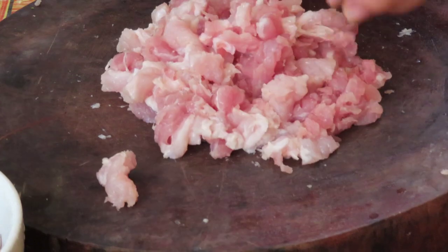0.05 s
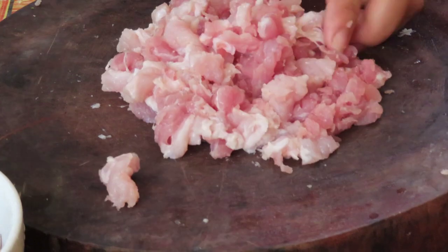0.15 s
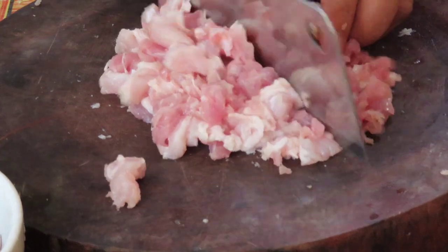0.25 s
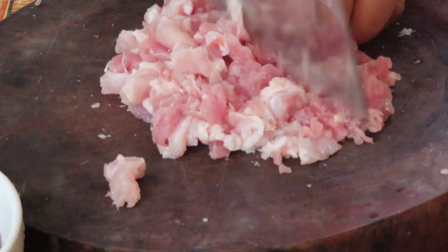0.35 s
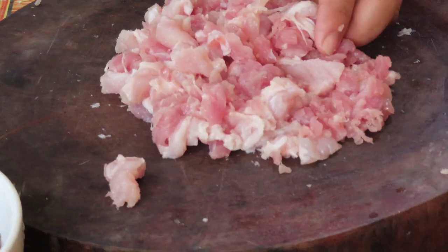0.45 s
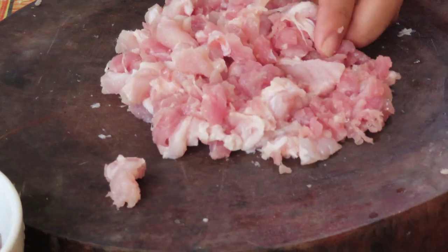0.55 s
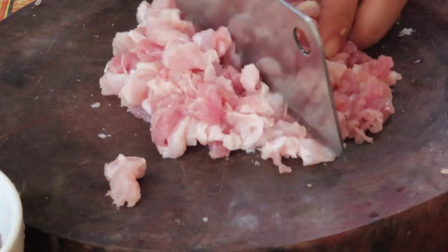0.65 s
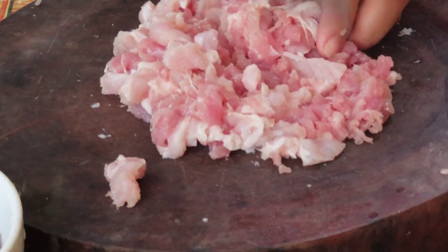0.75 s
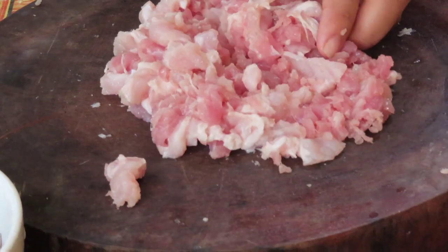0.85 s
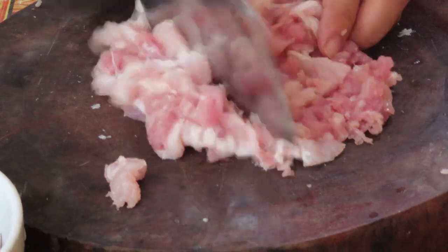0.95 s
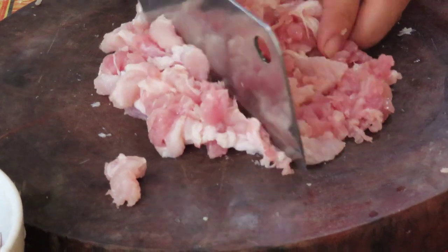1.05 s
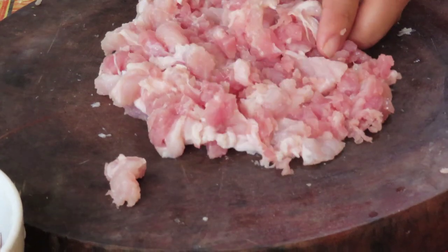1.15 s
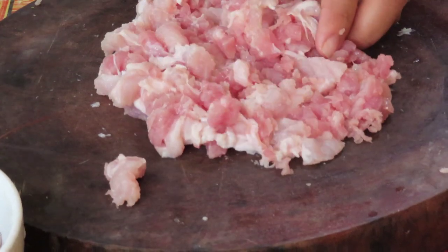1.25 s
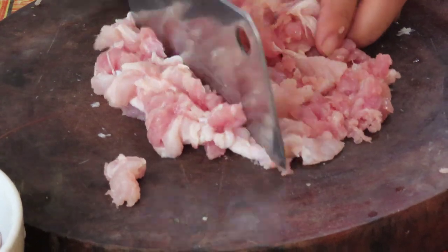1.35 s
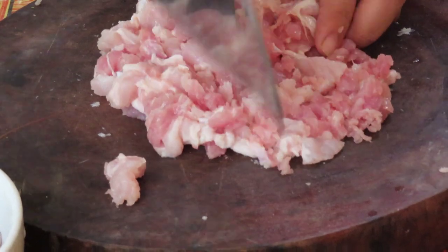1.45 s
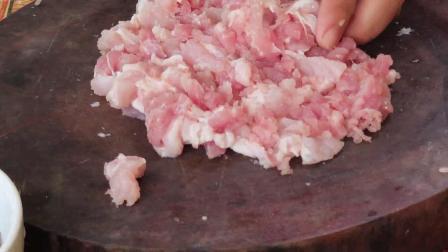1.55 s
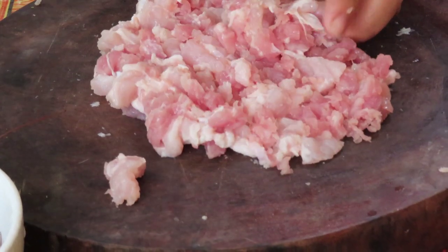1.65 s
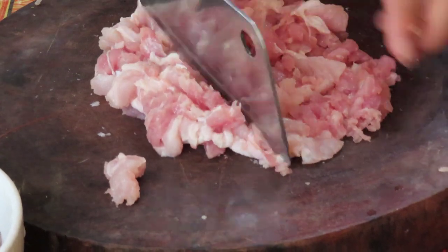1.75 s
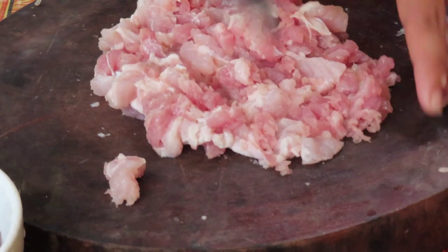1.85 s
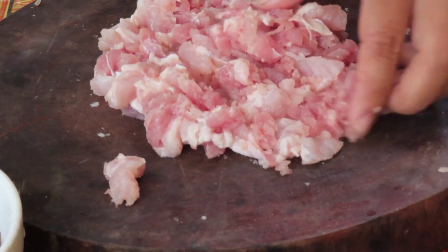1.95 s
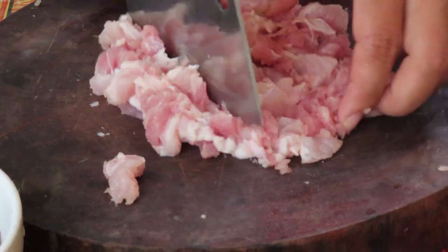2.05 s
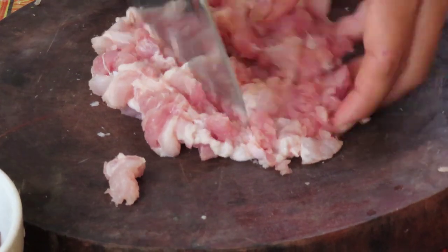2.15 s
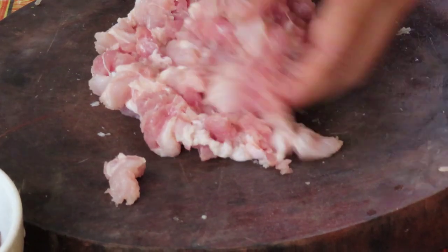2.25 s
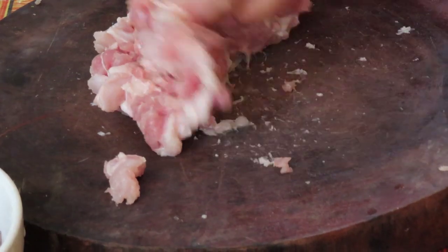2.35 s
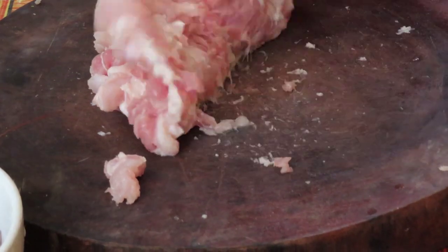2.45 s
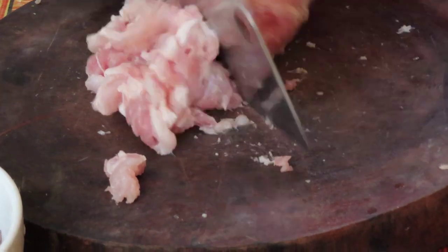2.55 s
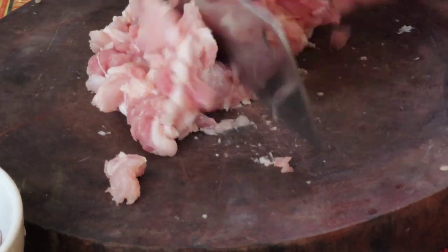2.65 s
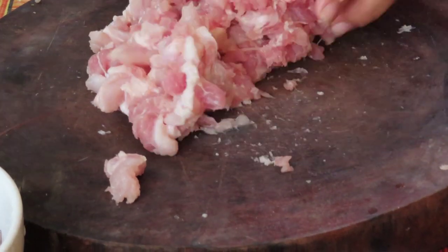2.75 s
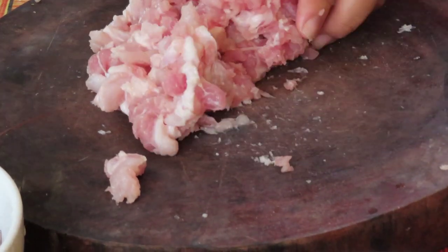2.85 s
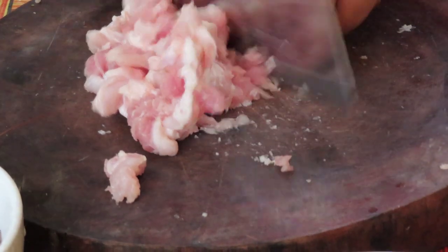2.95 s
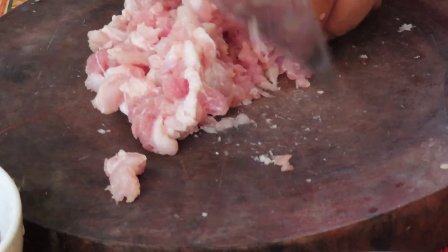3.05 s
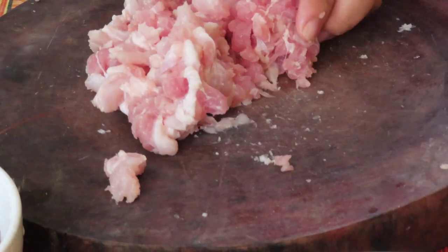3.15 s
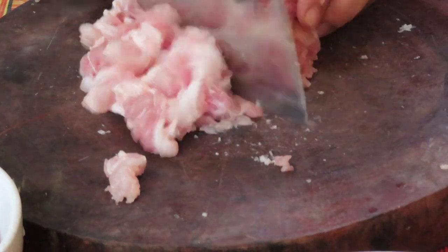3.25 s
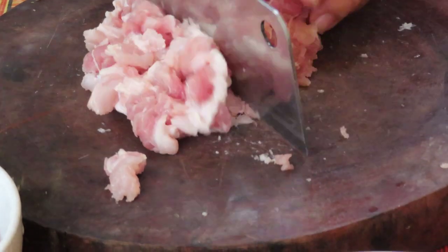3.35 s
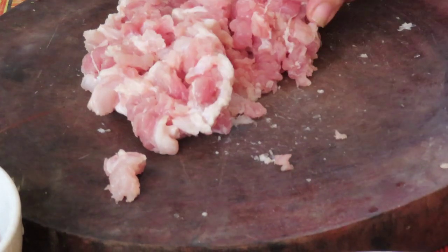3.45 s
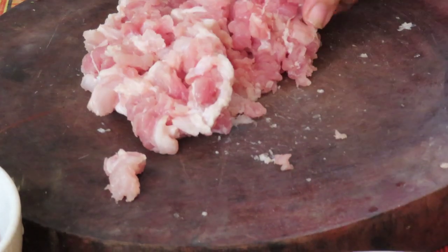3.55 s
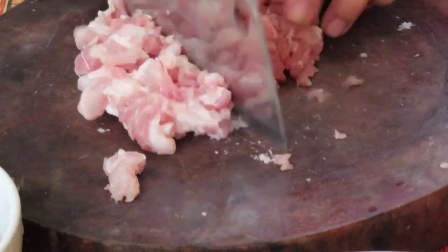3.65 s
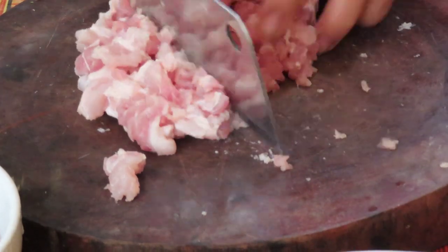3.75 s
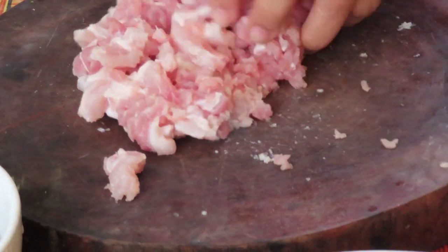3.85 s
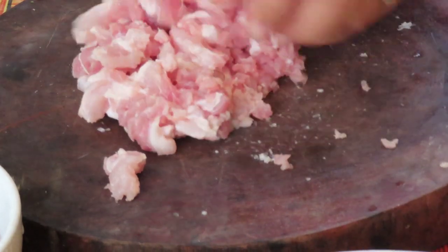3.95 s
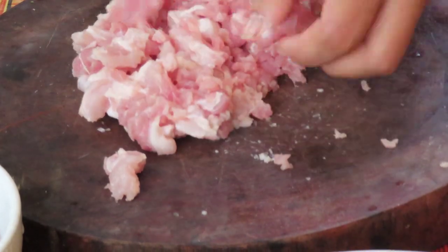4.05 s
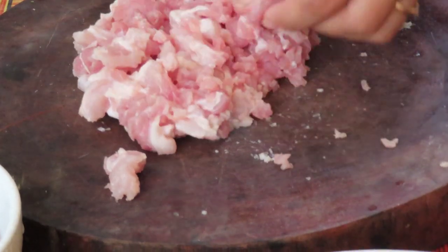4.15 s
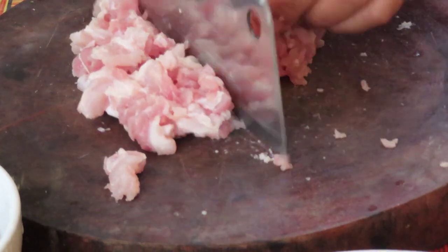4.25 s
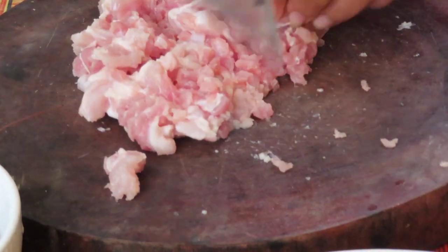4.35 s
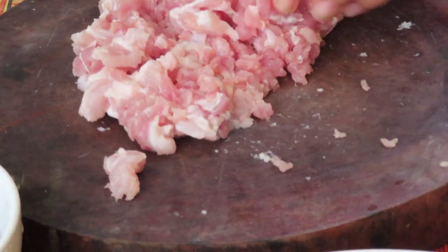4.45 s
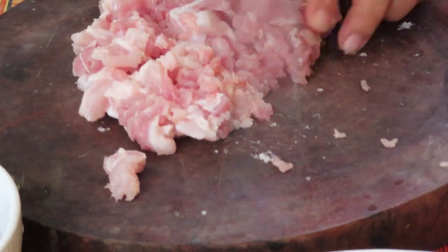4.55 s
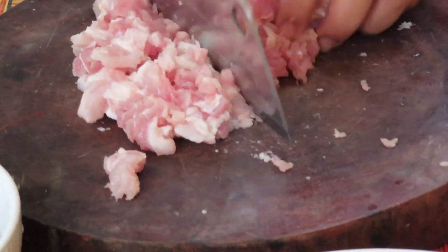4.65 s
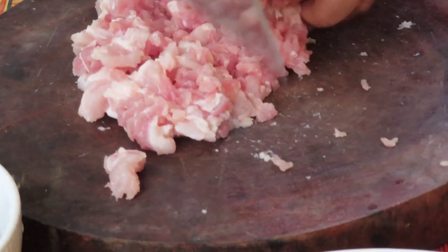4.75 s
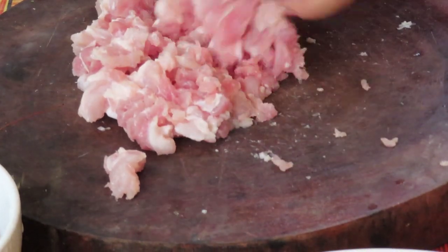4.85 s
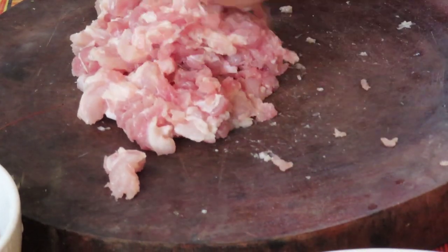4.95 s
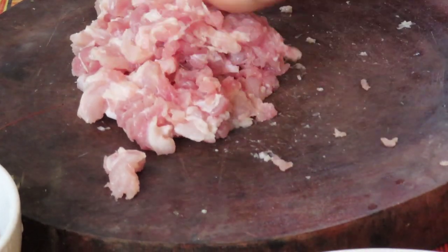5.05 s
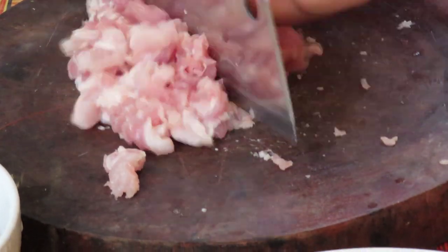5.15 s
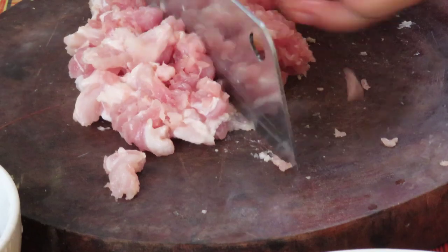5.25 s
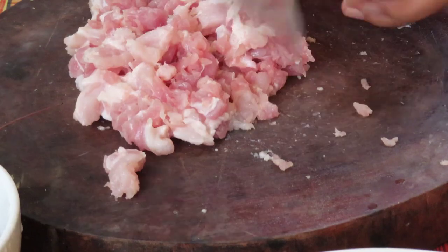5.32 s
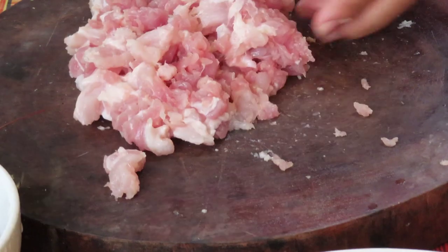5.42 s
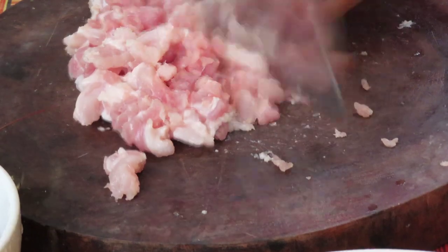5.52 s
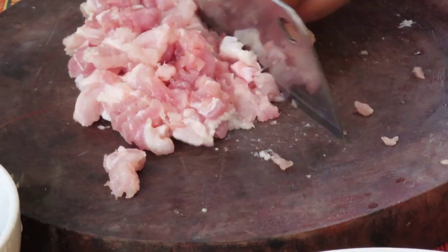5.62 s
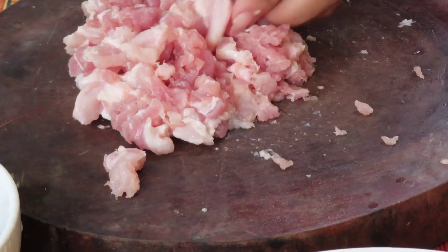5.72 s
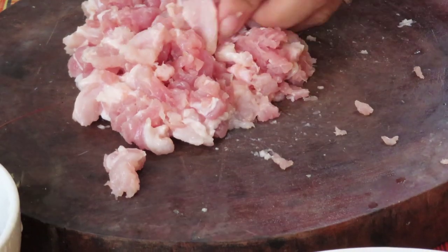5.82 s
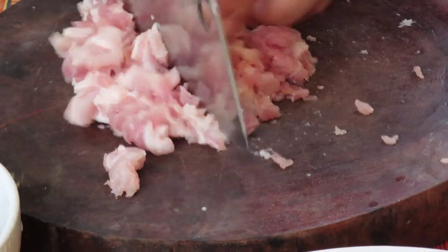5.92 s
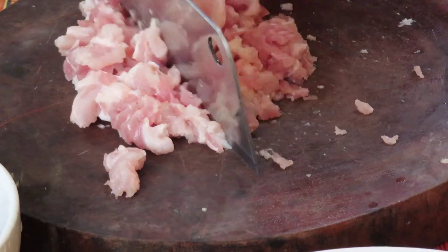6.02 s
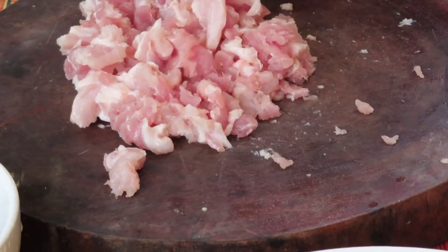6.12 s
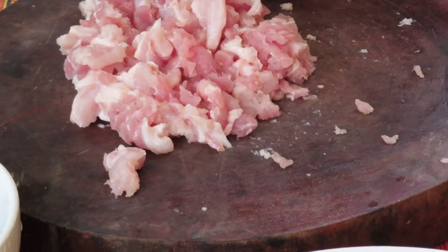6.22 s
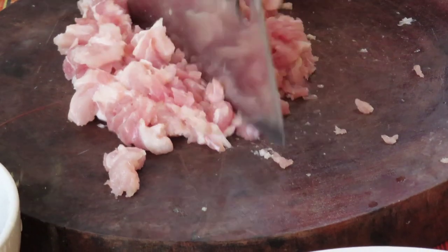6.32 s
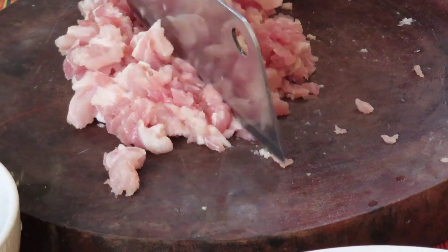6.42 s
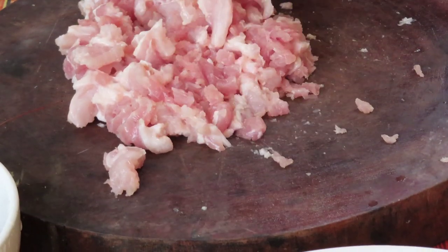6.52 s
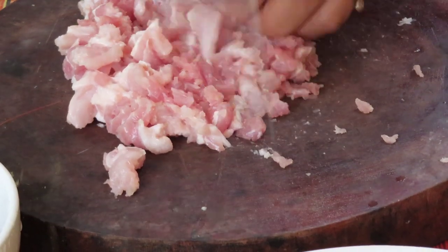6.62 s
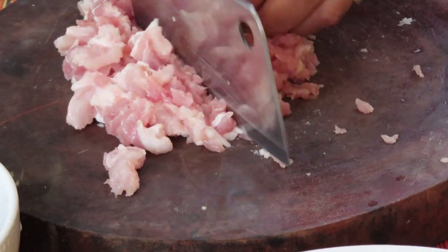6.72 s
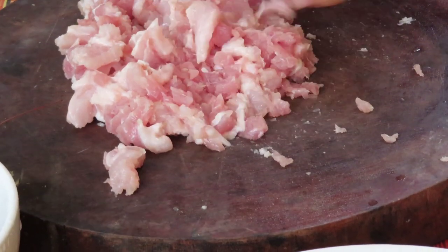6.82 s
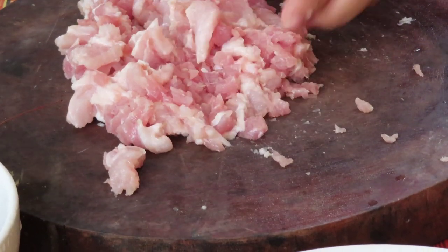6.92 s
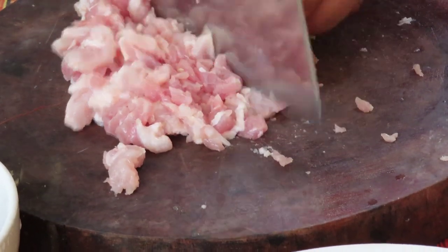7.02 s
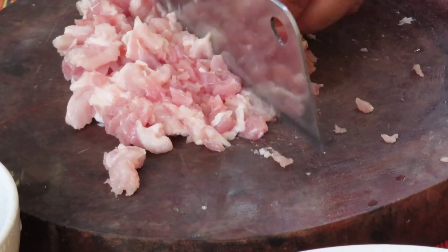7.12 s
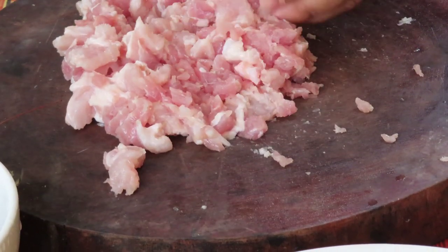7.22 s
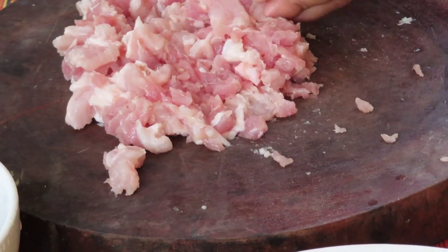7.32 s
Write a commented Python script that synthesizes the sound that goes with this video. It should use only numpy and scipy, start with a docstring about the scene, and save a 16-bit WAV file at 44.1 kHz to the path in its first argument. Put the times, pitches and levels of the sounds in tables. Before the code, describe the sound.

Steady single chops land on a heavy wooden block, nearly three per second, loud and close. Each is a sharp hollow knock with a table thump, then a brief rattle and tiny dish clinks as things settle. A thin, wavering metallic ring lingers until the next blow. The pace pauses slightly a few times; later chops knock softer but thump and rattle more. Open yard, faint low rumble, slight distant echo.

```python
"""Cleaver mincing meat on a board

A steel cleaver chops on a thick wooden board outdoors, close to a stereo microphone.
Dying sines make the board's knock, the table's thump, the dishes and the beating blade.
Shaped noise makes the soft lead-in to each knock, the rattle and the yard;
sparse echoes and a far wall answer."""
import sys
import numpy as np
from scipy import signal
from scipy.io import wavfile
from scipy.ndimage import uniform_filter1d

SR = 44100
rng = np.random.default_rng(int(sys.argv[2]) if len(sys.argv) > 2 else 0)


def to_wav(sig):
    """Store sig (one row per channel, or 1-D mono) as 16-bit WAV at the path in sys.argv[1].

    Samples outside -1..1 are clipped; the rate is SR.
    """
    pcm = np.clip(np.atleast_2d(sig), -1, 1) * 32767
    pcm = np.round(pcm).astype(np.int16)
    wavfile.write(sys.argv[1], SR, pcm.T)  # frames by channels


N = 325458
LEAD = SR // 10  # samples computed before the start, then cut


def gain_of(db):
    """Decibels to a factor."""
    return 10 ** (np.asarray(db) / 20)


def panned(right_db):
    """Left and right gains, right_db down and up."""
    return gain_of([[-right_db], [right_db]])


def evened(x):
    """Scales to rms 1."""
    return x / np.sqrt(np.mean(x ** 2) + 1e-20)


def seconds(count):
    """Time axis of count samples."""
    return np.arange(count) / SR


def build_up(count, rise_s):
    """Exponential approach to 1."""
    return 1 - np.exp(-seconds(count) / rise_s)


def read(points, hz):
    """Reads a curve on a log-frequency axis."""
    f, value = np.transpose(points)
    return np.interp(np.log(hz + 1), np.log(f + 1), value)


def add(mix, s, sound):
    """Mixes a sound in at s seconds."""
    part = mix[..., LEAD + round(s * SR):][..., :sound.shape[-1]]
    part += sound[..., :part.shape[-1]]


def struck(modes, length_s, spread_db=0):
    """Dying sines; spread_db varies each mode's strength at random."""
    t = seconds(round(length_s * SR))
    hz, db, t60 = np.transpose(modes)[:, :, None]
    db = db + spread_db * rng.standard_normal(db.shape)
    return (gain_of(db - 60 * t / t60) * np.sin(2 * np.pi * hz * t)).sum(0)


# Port difference. Each row: frequency in Hz, share of independent noise in dB.
PORT_UNLIKE = [(60, -30.5), (250, -20), (800, -15.5), (2000, -5.5), (5000, -1.5), (15000, -0.5)]
# Port phase. Each row: frequency in Hz, lead of the left port in radians.
PORT_LEAD = [(2000, 0), (6000, .1), (10000, 1.3), (16000, 3.0)]


def noise(colour, size, patchy_db):
    """Stereo coloured noise, patchy in time and frequency, as the two ports hear it."""
    frames = (N + LEAD) * 4 // size + 5
    hz = np.fft.rfftfreq(size, 1 / SR)
    a, b, c, d, patches = rng.standard_normal((frames, len(hz), 5)).T
    patches = uniform_filter1d(patches, size=8, axis=0)
    patches = evened(uniform_filter1d(patches, size=8, axis=1))
    unlike = np.clip(gain_of(read(PORT_UNLIKE, hz)), 0, 1)[:, None]
    left = a + 1j * b
    right = np.sqrt(1 - unlike ** 2) * left + unlike * (c + 1j * d)
    right = right * np.exp(-1j * read(PORT_LEAD, hz))[:, None]
    spectra = np.array([left, right]) * gain_of(read(colour, hz)[:, None] + patchy_db * patches)
    waves = signal.istft(spectra, nperseg=size, noverlap=size * 3 // 4)[1]
    return evened(waves[:, :N + LEAD])


# Yard noise colour. Each row: frequency in Hz, relative density in dB per Hz.
YARD_COLOUR = [(15, -46), (25, -25), (48, -1.5), (87, -6), (117, 0.5), (180, -11.5), (229, -13),
               (545, -23.5), (676, -20.5), (753, -20.5), (6550, -46), (16000, -67)]
# Yard swell. Each row: time in seconds, relative rumble level in dB.
YARD_SWELL = [(0, -60.5), (.9, -59), (1.298, -64), (3.401, -68.5), (4.4, -64), (6.001, -58), (7.38, -55.5)]
TONE_HZ, TONE_DB = 633, -68


def yard():
    """Distant rumble and air, coloured noise of slowly changing level, with one faint steady tone far off."""
    s, db = np.transpose(YARD_SWELL)
    t = seconds(N + LEAD) - LEAD / SR
    tone = gain_of(TONE_DB) * np.sin(2 * np.pi * TONE_HZ * t)
    rumble = noise(YARD_COLOUR, size=2048, patchy_db=1.5)
    return gain_of(np.interp(t, s, db) + 8.5) * rumble + tone


WALL_S, WALL_DB = .228, -30  # level before the high-pass


def near_echoes():
    """Sparse dull reflections from table and ground, a little unlike at the two ports."""
    count, spacing = SR // 2, 20
    taps = np.zeros((2, count))
    slots = np.arange(60, count - 20, spacing)
    at = slots + rng.integers(0, spacing, (2, len(slots)))
    np.put_along_axis(taps, at, rng.choice([-1., 1.], at.shape), 1)
    taps[1] = taps[0] + 0.41 * np.diff(taps[1], prepend=0)
    near = signal.lfilter([1], [1, -.7], taps) * gain_of(-60 * seconds(count) / 0.29)
    return near * gain_of(-23.5) / np.linalg.norm(near[0])


def wall_echo():
    """One far wall scatters the treble back."""
    wall = np.zeros(SR // 2)
    scatter = rng.standard_normal(200) * np.exp(-np.arange(200) / 90)
    wall[round(WALL_S * SR):][:200] = gain_of(WALL_DB) * scatter / np.linalg.norm(scatter)
    return signal.sosfilt(signal.butter(2, 3000, "high", fs=SR, output="sos"), wall)


def surroundings(board, shaken):
    """Near reflections of board and shaken dishes; the far wall answers the board only."""
    near = signal.fftconvolve((board + shaken)[None], near_echoes(), axes=1)
    around = near + signal.fftconvolve(board, wall_echo())
    return around[:, :len(board)]


CREST_S, EARLY_S = .009, .0115  # crest after the knock; greatest advance
SOFT_DB, LOUD_DB = -41, -38  # table lead-in levels of no advance and of the greatest


def crest(s, lead_in_db):
    """Moment of the thump's crest: earlier where the lead-in noise is louder."""
    advance = np.clip((lead_in_db - SOFT_DB) / (LOUD_DB - SOFT_DB), 0, 1)
    return s + CREST_S - EARLY_S * advance


# Chops. Each row: knock time in seconds, then relative levels in dB of knock, thump, lead-in noise,
# first landing, second landing and rock, then beat swell in seconds after the knock,
# then relative levels in dB of lower ring, upper ring and overtones.
CHOP_ROWS = [(-0.033, -5, -19, -40, -24.5, -39, -26, 0.111, -47, -40.5, -46.5),
             (0.33, -1.5, -12, -40.5, -16.5, -26.5, -20.5, 0.125, -34.5, -38, -52.5),
             (0.692, -4, -11, -42, -62, -27, -23, 0.157, -38, -44, -48),
             (1.0494, -1, -10, -42.5, -62, -38.5, -31, 0.118, -43.5, -59, -48),
             (1.408, -2.5, -12.5, -46, -29, -47, -39, 0.051, -65, -49, -61),
             (1.763, 0.45, -16, -65, -33.5, -51, -26.5, 0.108, -50.5, -45.5, -56),
             (2.1129, -3, -16.5, -41.5, -59, -59, -46.5, 0.077, -51.5, -59, -62),
             (2.627, 0.9, -17.5, -57.5, -61, -47, -28.5, 0.126, -50, -48, -57),
             (3.0021, -2, -19.5, -57.5, -54, -64, -25.5, 0.124, -64.5, -55.5, -64),
             (3.3687, -9.5, -15.5, -48.5, -34, -67, -41, 0.115, -45, -47, -54),
             (3.7328, -8.5, -14.5, -45, -62, -40.5, -29, 0.156, -41.5, -46.5, -57.5),
             (4.2878, -2, -13, -58.5, -27, -39.5, -33, 0.114, -49, -82, -47),
             (4.6692, -5.5, -14, -62.5, -27, -46, -41, 0.063, -44.5, -58.5, -70.5),
             (5.2344, -4.5, -12, -48, -30, -24, -15, 0.172, -40.5, -37, -48.5),
             (5.6287, -13, -10.5, -35.5, -24, -24, -17, 0.188, -44, -72, -49),
             (5.9985, -5.5, -6, -40.5, -23.5, -42, -41, 0.121, -44.5, -47.5, -49),
             (6.3786, -8, -7.5, -38.5, -40, -36, -37, 0.144, -40.5, -55, -46.5),
             (6.7521, -2.5, -12.5, -45, -21.5, -29, -18.5, 0.095, -42.5, -40, -46),
             (7.1137, -4.5, -7, -46, -46, -45, -31, 0.108, -45.5, -42, -52)]
LAND_S, RELAND_S = .052, .091  # after the thump crest


def landings():
    """Time and level of both landings of the dishes after every chop."""
    found = []
    for s, _, _, lead_in_db, first_db, second_db, *_ in CHOP_ROWS:
        crest_s = crest(s, lead_in_db)
        found += [(crest_s + LAND_S, first_db), (crest_s + RELAND_S, second_db)]
    return found


# Dish modes. Each row: frequency in Hz, relative level in dB, t60 in seconds.
DISH_MODES = [(888, -9, .04), (1570, -7, .05), (2060, -10, .05), (2430, -12, .06), (2690, -11, .04),
              (3130, -23, .22), (3230, -9, .07), (3370, -5, .06), (4050, -14, .04), (5110, -17, .025),
              (5960, -17, .03), (6180, -9, .03), (8110, -24, .02)]
LAND_PAN_DB, LAND_PAN_SPREAD_DB = 2.2, 2.0  # left over right


def clinks():
    """Each landing is a ms of chatter that rings the dishes, usually to the left."""
    out, t = np.zeros((2, N + LEAD)), seconds(300)
    for s, db in landings():
        pan_db = LAND_PAN_DB + LAND_PAN_SPREAD_DB * rng.standard_normal()
        chatter = rng.standard_normal(len(t)) * np.exp(-t / .001)
        dishes = struck(DISH_MODES, .25, spread_db=2.5)
        sound = signal.fftconvolve(chatter / np.linalg.norm(chatter), dishes)
        add(out, s, gain_of(db - 5.0) * panned(-pan_db / 2) * sound)
    return out


# Rattle colour. Each row: frequency in Hz, relative density in dB per Hz.
RATTLE_COLOUR = [(120, -36.5), (200, -14), (366, -5), (465, -8.5), (899, -3), (3010, -17.5), (3300, -19),
                 (11900, -36), (16000, -44.5)]
USUAL_THUMP_DB = -12  # table level
RATTLE_DB, RATTLE_SLOPE = -22, 0.69  # at the usual thump; dB per dB of thump
SHAKE_RISE_S, SHAKE_DB_PER_S = 0.0013, 159
SETTLE_S, SETTLE_DB_PER_S = 0.12, 218.5  # extra decay once the dishes settle
LINGER_S, LINGER_DB, LINGER_DB_PER_S = .45, -31.5, 59.5  # faint buzz outlasting the shake


def shaking():
    """Envelope of one shake: fast rise, decay that steepens as the dishes settle, faint linger."""
    t = np.arange(0, LINGER_S, 1 / SR)
    shake = gain_of(-SHAKE_DB_PER_S * t - SETTLE_DB_PER_S * np.maximum(t - SETTLE_S, 0))
    linger = gain_of(LINGER_DB - LINGER_DB_PER_S * t)
    return (shake + linger) * np.minimum(t / SHAKE_RISE_S, 1)


def rattle():
    """Table and dishes buzz in uneven grains, flaring at landings; soft noise swells in 30 ms before knocks."""
    count = N + LEAD
    level, lead_in = np.zeros(count), np.zeros(count)
    shake = shaking()
    before_s = np.arange(-.03, 0, 1 / SR)
    flare = np.exp(-seconds(1500) / .013) * build_up(1500, 0.0032)
    for s, _, thump_db, lead_in_db, *_ in CHOP_ROWS:
        shake_db = RATTLE_DB + RATTLE_SLOPE * (thump_db - USUAL_THUMP_DB)
        add(level, s - SHAKE_RISE_S / 2, gain_of(shake_db) * shake)
        add(lead_in, s + before_s[0], gain_of(lead_in_db + 20.5 + 1010 * before_s))
    for s, db in landings():
        add(level, s, gain_of(db - 2.0) * flare)
    grains = gain_of(2.0 * evened(uniform_filter1d(rng.standard_normal(count), size=350)))
    buzz = noise(RATTLE_COLOUR, size=512, patchy_db=3.0)
    # about 250 random contacts per second keep the dishes singing
    contacts = level * rng.standard_normal(count) * (rng.random(count) < 250 / SR)
    ringing = gain_of(-13) * signal.oaconvolve(contacts, struck(DISH_MODES, 0.27))[:count]
    thinner = signal.lfilter([1, -.8], 1, buzz)
    return ringing + grains * (level * buzz + lead_in * thinner)


# Blade overtones. Each row: frequency in Hz, relative level in dB, t60 in seconds.
BLADE_OVERTONES = [(1071, 0, .7), (2051, -14, .6), (2433, -13, .6), (3128, -12, .3), (1857, -17, .4)]
# Hum mode. Each row: frequency in Hz, relative level in dB, t60 in seconds.
HUM_MODES = [(362, 3, .3)]
PAIR_HZ, PAIR_T60_S = (667, 674), .9
FREE_S, HUM_S = .09, .1  # after the knock
HUM_DB, HUM_SLOPE = -43, 0.29  # relative, at the usual thump; dB per dB of thump


def blade():
    """Freed steel rings until the next chop damps it; two close modes beat, beside a short low hum."""
    out = np.zeros(N + LEAD)
    stops = [row[0] for row in CHOP_ROWS[1:]] + [N / SR + .1]
    for row, stop in zip(CHOP_ROWS, stops):
        s, _, thump_db, *_, swell_s, lower_db, upper_db, over_db = row
        ring = gain_of(over_db) * struck(BLADE_OVERTONES, stop - s - FREE_S, spread_db=3.5)
        t = seconds(len(ring))
        for hz, db in zip(PAIR_HZ, (lower_db, upper_db)):
            # both modes are in phase at swell_s
            phase = 2 * np.pi * hz * (t + FREE_S - swell_s)
            ring = ring + gain_of(db - 60 * t / PAIR_T60_S) * np.cos(phase)
        fades = np.clip(t / .015, 0, 1) * np.clip((t[-1] - t) / .01, 0, 1)
        add(out, s + FREE_S, ring * fades)
        hum_db = HUM_DB + HUM_SLOPE * (thump_db - USUAL_THUMP_DB)
        hum = struck(HUM_MODES, 0.46)
        add(out, s + HUM_S, gain_of(hum_db) * hum * np.clip(seconds(len(hum)) / .02, 0, 1))
    return out


# Table modes. Each row: frequency in Hz, relative level in dB, t60 in seconds.
TABLE_MODES = [(126, -1, 0.12), (150.9, -6.5, 0.17), (103.4, -15, 0.3), (51.7, -23, 0.11)]
# Low board modes. Each row: frequency in Hz, relative level in dB, t60 in seconds.
LOW_BOARD_MODES = [(393.2, -8.5, 0.068), (356, -4, 0.095), (292.6, -7.5, 0.091), (235.4, -5, 0.064),
                   (196.5, -6.5, 0.093)]


def thumps():
    """The blow's weight pushes the table down slowly, rings low board modes; the table rebounds once."""
    out, push = np.zeros(N + LEAD), signal.windows.hann(200)
    for s, _, thump_db, lead_in_db, *_ in CHOP_ROWS:
        start = crest(s, lead_in_db) - .0085
        ring = -np.convolve(struck(TABLE_MODES, .35, spread_db=1.0), push / push.sum())
        add(out, start, gain_of(thump_db + 4.0) * ring)
        add(out, start + 0.03446, gain_of(thump_db - 11.5) * ring)  # rebound
        low = struck(LOW_BOARD_MODES, .15, spread_db=3.0)
        add(out, start + 0.00099, -gain_of(thump_db + 3.0) * low * build_up(len(low), 0.0037))
    return out


# Board modes. Each row: frequency in Hz, relative level in dB, t60 in seconds.
BOARD_MODES = [(906, 7.5, 0.028), (789, -3.5, 0.059), (1142, -7.5, 0.029), (701, -12.5, 0.069),
               (497, -30, 0.017), (1320, -12, 0.004), (1280, -14, .03), (1570, -13.5, 0.069),
               (2036, -21, 0.062), (2053, -28, 0.14), (2340, -26.5, 0.015)]
ROCK_S, LAND_KNOCK_DB = .078, -4  # after the thump crest; knock relative to first landing


def rocks():
    """First landing and rocking back knock the board softly: its modes, struck over a few ms."""
    out = np.zeros(N + LEAD)
    for s, _, _, lead_in_db, first_db, _, rock_db, *_ in CHOP_ROWS:
        for after_s, db in ((LAND_S, first_db + LAND_KNOCK_DB), (ROCK_S, rock_db)):
            ring = struck(BOARD_MODES, .15, spread_db=2.5)
            ring = ring * build_up(len(ring), 0.0042)
            add(out, crest(s, lead_in_db) + after_s, gain_of(db) * ring)
    return out


def knocks():
    """The edge meets the board with a tick; its modes build up within a millisecond and die."""
    out, contact, t = np.zeros(N + LEAD), signal.windows.hann(8), seconds(200)
    for s, knock_db, *_ in CHOP_ROWS:
        ring = gain_of(knock_db - 4.0) * struck(BOARD_MODES, .15, spread_db=3.0)
        ring = np.convolve(ring, contact / contact.sum())
        add(out, s - .0008, ring * build_up(len(ring), 0.00052))
        tick = signal.lfilter([1, 2, 1], [1, -.8], rng.standard_normal(len(t)))
        add(out, s - .0008, gain_of(knock_db - 41) * tick * np.exp(-t / 0.0012))
    return out


def scene():
    """All sources; the board sits a little to the right and radiates little deep bass."""
    board = knocks() + rocks()
    shaken = rattle() + clinks()
    chop = board * panned(.55) + thumps() * panned(.15)
    chop = signal.sosfilt(signal.butter(2, 72, "high", fs=SR, output="sos"), chop)
    around = surroundings(board, shaken.mean(0))
    mix = chop + blade() * panned(.4) + shaken + around + yard()
    return mix[:, LEAD:]


EDGE_HZ = 15700


def record(dry):
    """Peaks flatten just under full scale; then a steep low-pass limits the band."""
    held = np.clip(dry, -.97, .97)
    low_pass = signal.firwin(511, EDGE_HZ, window=("kaiser", 9), fs=SR)
    return signal.oaconvolve(held, low_pass[None], "same")


dry = scene()
out = record(dry)
to_wav(out)
```